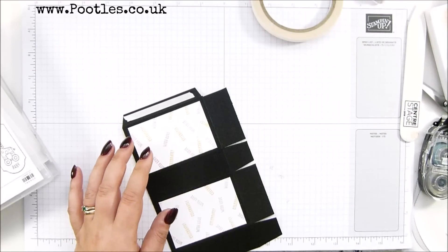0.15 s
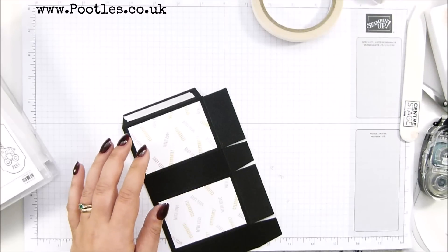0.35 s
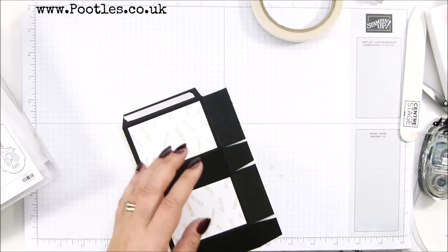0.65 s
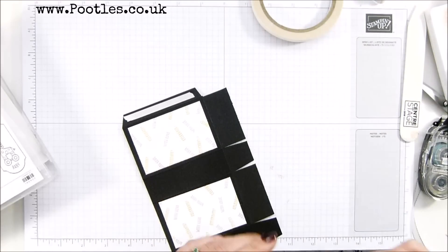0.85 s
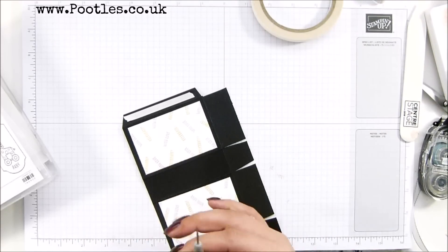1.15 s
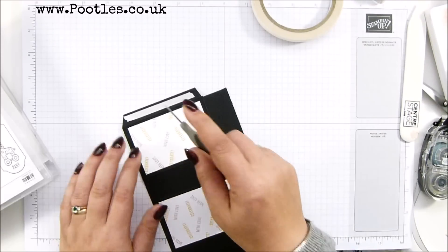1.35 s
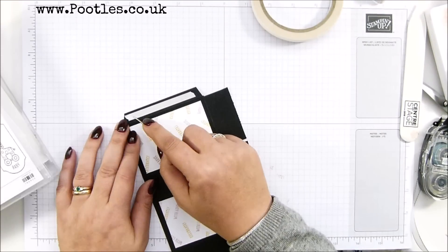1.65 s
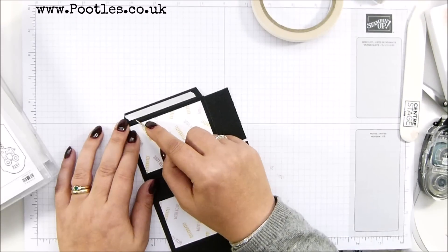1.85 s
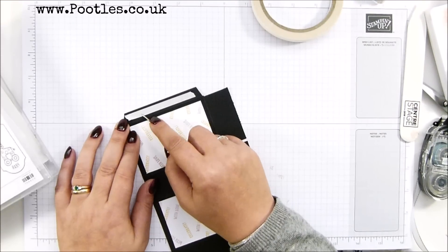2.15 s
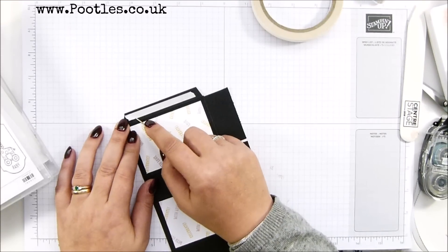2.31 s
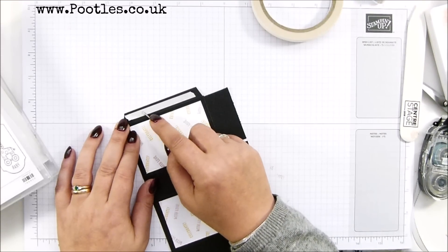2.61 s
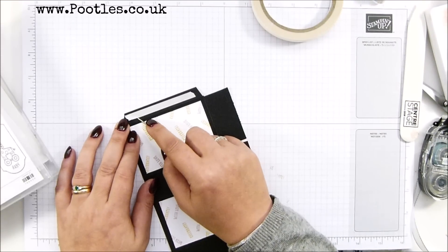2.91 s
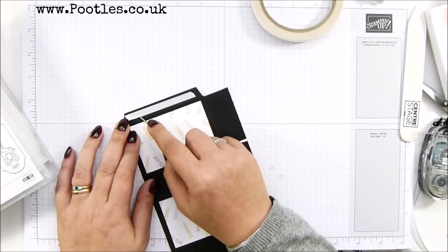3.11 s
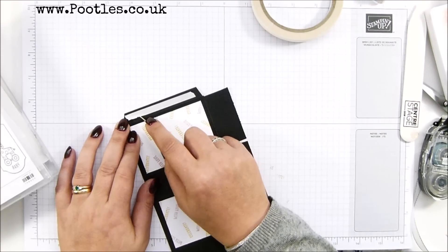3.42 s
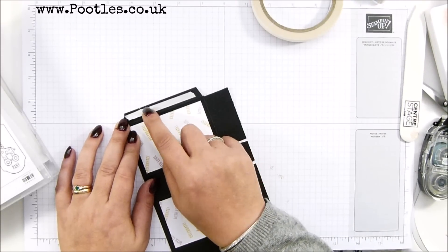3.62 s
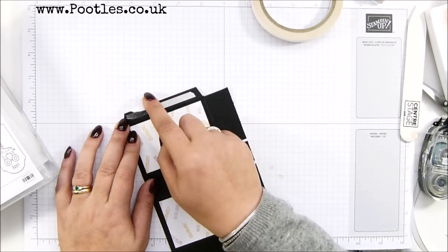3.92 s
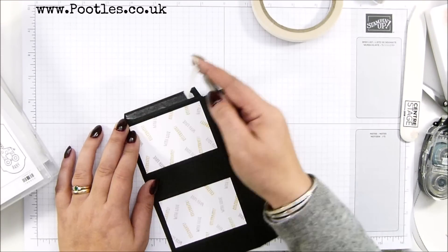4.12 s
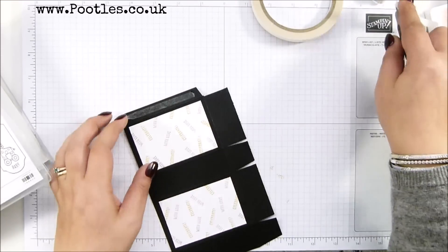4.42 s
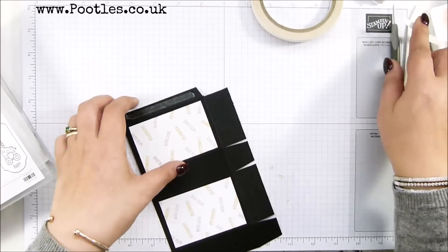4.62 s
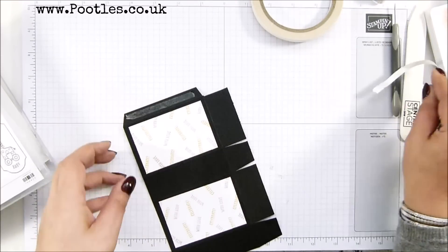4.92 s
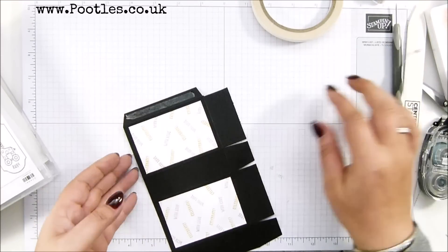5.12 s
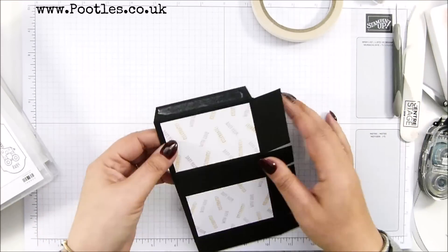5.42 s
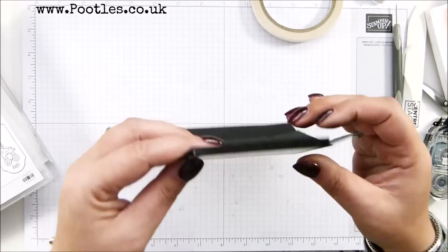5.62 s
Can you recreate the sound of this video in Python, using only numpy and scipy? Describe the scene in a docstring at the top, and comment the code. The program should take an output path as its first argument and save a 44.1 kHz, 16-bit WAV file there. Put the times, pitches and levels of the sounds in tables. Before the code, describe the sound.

A close stereo pickup at a craft table in a small room, with soft steady hiss and barely audible hum and whine. From 0 to 0.9 s a hand rummages in a hollow tool holder slightly to the right: uneven knocks, clinks and rough sliding, strongest at 0.37 to 0.7 s with a heavy clack near 0.55 s. By 1.1 s it is nearly silent. From 1.5 to 3 s a pointed tip makes sparse, tiny ticks on card, about every 0.3 s, with faint palm thuds and skin rubs. Around 3.45 to 3.65 s come very high, thin falling squeaks, then dry sticky crackling of the backing peeling, in small surges until a sharp snap at 4.15 s. The tool lands with a dull wooden knock at 4.66 s. A quiet gap follows; from 5.15 to 5.5 s card slides with a papery, slightly hollow rasp and light flicks, ending in faint rustles.

```python
"""A hand rummages in a tool holder, whose modes ring under knocks and stick-slip, and takes out a pointed tool.
Its tip picks at the liner of double-sided tape on a card: small blows on the table modes.
The liner peels off in crackling glue with thin gliding squeaks and snaps free; the tool is put down.
The card is slid over the table as resonant friction, its air gap sings, and it is lifted.
Palms press and rub as noise; a small room adds tails, hiss, a faint hum and a whine."""
import sys
import numpy as np
from scipy import signal
from scipy.fft import rfft, irfft, next_fast_len
from scipy.io import wavfile

SR = 44100
rng = np.random.default_rng(int(sys.argv[2]) if len(sys.argv) > 2 else 0)


def wav_out(sig):
    """Save sig, one row per channel (or a flat mono array), as 16-bit PCM at SR to the path in sys.argv[1]."""
    wavfile.write(sys.argv[1], SR, np.round(np.clip(np.atleast_2d(sig).T, -1, 1) * 32767).astype(np.int16))


N = 253575
TIME = np.arange(N) / SR   # seconds


def from_db(db):
    """Level law: decibels become an amplitude ratio."""
    return 10 ** (np.asarray(db) / 20)


def rms(x):
    """Effective value: the root of the mean square."""
    return np.sqrt(np.mean(x ** 2) + 1e-20)


def at_hz(points, hz):
    """Logarithmic frequency scale: read a table in equal steps of pitch."""
    f, value = np.transpose(points)
    return np.interp(np.log(np.maximum(hz, 1)), np.log(f), value)


def band(x, low, high):
    """Band filtering: a causal band-pass keeps one range of frequencies."""
    return signal.sosfilt(signal.butter(3, [low, high], "band", fs=SR, output="sos"), x)


def coloured(pair, colour, likeness):
    """Partial coherence: shared and opposed signals set the left-right correlation and spectrum; rms 1."""
    size = pair.shape[1]
    padded = next_fast_len(size)
    hz = np.fft.rfftfreq(padded, 1 / SR)
    mid, side = rfft(pair, padded) * from_db(at_hz(colour, hz))
    alike = np.clip(at_hz(likeness, hz), -1, 1)
    shared = np.sqrt(1 + alike) * mid
    opposed = np.sqrt(1 - alike) * side * [[1], [-1]]
    out = irfft(shared + opposed, padded)[:, :size]
    return out / rms(out)


def noise(colour, likeness, size=N):
    """Random excitation: steady Gaussian stereo noise of a given colour."""
    return coloured(rng.standard_normal((2, size)), colour, likeness)


def dying(t, t60):
    """Exponential decay: 60 dB lost in t60 seconds."""
    return np.exp(-np.log(1000) * t / t60)


# Left-right correlation of nearby sources. Each row: frequency in Hz, correlation from -1 to 1.
NEAR_LIKENESS = [(100, 1), (400, 0.99), (750, 0.93), (1600, 0.77), (4000, 0.39), (9000, 0.26)]


def ringing(modes, t, spread_db):
    """Modal superposition: damped sines of random strength, high ones out of step at the two capsules."""
    hz, db, t60 = np.transpose(modes)[:, :, None]
    strength = from_db(db + spread_db * rng.standard_normal(hz.shape)) * rng.choice([-1, 1], hz.shape)
    skew = np.arccos(np.clip(at_hz(NEAR_LIKENESS, hz), -1, 1)) / 2 * rng.choice([-1, 1], hz.shape)
    fade = strength * dying(t, t60)
    return np.array([(fade * np.sin(2 * np.pi * hz * t + side * skew)).sum(0) for side in (1, -1)])


def panned(pan_db, hz):
    """Diffraction: long waves reach both capsules alike; the full difference holds from 2 kHz up."""
    return from_db(np.array([[.5], [-.5]]) * pan_db * min(1, hz / 2000))   # positive is left


# Edges in Hz of the four zones of a sound: thud, body, ring and crack.
ZONE_EDGES_HZ = [60, 200, 900, 2800, 16000]
# added to every room tail; time constant of its build-up; low-pass corner of its dulling
ROOM_DB, ROOM_BUILD_S, WALL_CUT_HZ = 2, 0.0016, 17000


def blows(rows, modes, colour, thud_db, pan_db, clear_db, spot_db, spot_cycles,
          crack_t60, echo_s, echo_db, tail_db, tail_t60, rise_s):
    """Impact excitation: a blow rings spot and clear modes, and dense ones with an echo and a room tail."""
    t = np.arange(int(.4 * SR)) / SR
    attacks = [t < .04, t < .012, t < .012, t < .012]   # where the level of each zone is set
    out = np.zeros((2, N + len(t)))
    reflection = from_db(echo_db) * (t > echo_s) * dying(np.abs(t - echo_s), crack_t60)
    crack = np.hypot(dying(t, crack_t60), reflection)
    build_up = 1 - np.exp(-t / ROOM_BUILD_S)
    tail = from_db(tail_db + ROOM_DB) * dying(t, tail_t60) * build_up
    walls = signal.butter(1, WALL_CUT_HZ, fs=SR)   # the room returns a duller sound
    for s, body_db, ring_db, crack_db, spot_hz in rows:
        direct = noise(colour, NEAR_LIKENESS, len(t)) * crack
        returned = signal.lfilter(*walls, noise(colour, NEAR_LIKENESS, len(t))) * tail
        dense = direct + returned
        clear = ringing(modes, t, spread_db=4.0)
        # the spot itself dies by 60 dB within a set number of cycles
        spot = ringing([(spot_hz, 0, spot_cycles / spot_hz)], t, spread_db=0)
        layers = [(dense, 0), (clear, clear_db), (spot, spot_db)]
        hit = sum(from_db(db) * x / rms(x[:, attacks[1]]) for x, db in layers)
        hit = hit * (1 - np.exp(-t / rise_s))   # the contact takes a moment to build
        start = max(0, round(s * SR))
        # weight and hardness of the contact set the shares; the low thud follows the body
        levels_db = body_db + thud_db, body_db, ring_db, crack_db
        for low, high, db, attack in zip(ZONE_EDGES_HZ, ZONE_EDGES_HZ[1:], levels_db, attacks):
            part = band(hit, low, high)
            gain = from_db(db) * panned(pan_db, high)
            out[:, start:start + len(t)] += gain * part / rms(part[:, attack])
    return out[:, :N]


STROKE_SHAPE = 1.28   # 1 = pointed, 2 = bell-shaped


def strokes(rows):
    """Power addition: strokes swell and fade, rise and fall reaching 20 dB below the peak; one curve per dB."""
    peak_s, rise_s, fall_s, *columns = np.transpose(rows)[:, :, None]
    away = np.maximum((peak_s - TIME) / rise_s, (TIME - peak_s) / fall_s)
    swell = 10 ** -np.minimum(np.abs(away) ** STROKE_SHAPE, 10)
    return [np.linalg.norm(from_db(db) * swell, axis=0) for db in columns]


def slips(per_s, spread_db, smooth):
    """Stick-slip: tiny clicks of uneven size at random moments, on a bed of smooth rubbing."""
    sizes = (rng.random(N) < per_s / SR) * from_db(spread_db * np.minimum(rng.exponential(1, N), 4))
    # each click dies with a time constant of 0.44 ms
    grains = signal.lfilter([1], [1, -np.exp(-1 / (0.00044 * SR))], sizes + 1e-18)
    return (grains / rms(grains) + smooth) * rng.standard_normal((2, N))


def resonance(x, hz, q):
    """Resonance: a two-pole filter with gain 1 at its peak."""
    return signal.lfilter(*signal.iirpeak(hz, q, fs=SR), x + 1e-18)


def crackle(per_s, spread_db, q, smooth):
    """Random resonant impulses: tiny snaps, each dealt one of 28 pitches, over a smooth hiss."""
    pitches = np.geomspace(900, 15000, 28)   # Hz
    sizes = (rng.random(N) < per_s / SR) * from_db(spread_db * np.minimum(rng.exponential(1, N), 3))
    clicks = sizes * rng.choice([-1, 1], (2, N))
    dealt = rng.integers(0, len(pitches), N)
    snaps = sum(resonance(clicks * (dealt == k), hz, q) for k, hz in enumerate(pitches))
    return snaps / rms(snaps) + smooth * rng.standard_normal((2, N))


def friction(rows, grains, colour, modes, ring_db, pan_db):
    """Friction-driven resonance: grains hiss at the contact and shake the modes of the rubbed thing."""
    drag_gain, hiss_gain = strokes(rows)
    rub = coloured(grains, colour, NEAR_LIKENESS)
    response = ringing(modes, TIME[TIME < .2], spread_db=1)
    rung = signal.fftconvolve(grains[:1], response, axes=1)[:, :N]
    rub = rub + from_db(ring_db) * rung / rms(rung)
    drag = band(rub, ZONE_EDGES_HZ[0], ZONE_EDGES_HZ[3])
    hiss = band(rub, *ZONE_EDGES_HZ[3:])
    return (drag_gain * drag / rms(drag) + hiss_gain * hiss / rms(hiss)) * panned(pan_db, ZONE_EDGES_HZ[3])


def whistle(hz, width_hz):
    """Amplitude modulation: slow noise on a gliding tone makes a narrow band around it; rms 1."""
    waver = signal.sosfilt(signal.butter(2, width_hz, fs=SR, output="sos"), rng.standard_normal((2, N)))
    tone = np.sin(2 * np.pi * np.cumsum(hz) / SR)
    return coloured(waver * tone, [(1, 0)], NEAR_LIKENESS)


# Spectrum of the room hiss. Each row: frequency in Hz, relative level in dB per Hz.
AIR_COLOUR = [(15, -51), (25, -18.5), (108, -6.5), (149, -10), (263, -12.5), (416, -10), (476, -14),
              (1130, -12), (1610, -16), (1890, -16.5), (2110, -18), (2350, -17.5), (3160, -19),
              (10700, -24), (16000, -32)]
# Left-right correlation of the room hiss. Each row: frequency in Hz, correlation from -1 to 1.
AIR_LIKENESS = [(100, 0.93), (300, 0.666), (750, 0.025), (1600, -0.55), (4000, -0.14), (9000, -0.077)]
# A faint whine swelling once. Each row: peak in seconds, rise in seconds, fall in seconds, rms level in dB.
WHINE = [(3.6, 3.0, 0.46, -76)]
AIR_DB, MAINS_DB = -60.5, -77   # rms levels
MAINS_HZ, WHINE_HZ = 100, 1170


def room_tone():
    """Superposition of stationary noise and pure tones: hiss, mains hum and a faint swelling whine."""
    whine_gain, = strokes(WHINE)
    hum = from_db(MAINS_DB) * np.sin(2 * np.pi * MAINS_HZ * TIME)
    whine = whine_gain * np.sin(2 * np.pi * WHINE_HZ * TIME)
    hiss = from_db(AIR_DB) * noise(AIR_COLOUR, AIR_LIKENESS)
    return hiss + np.sqrt(2) * (hum + whine)   # root 2 turns rms into peak


# Tools knocking about in their holder. Each row: start in seconds, then levels before the layer gain:
# body 200-900 Hz in dB, ring 900-2800 Hz in dB, crack above 2800 Hz in dB; pitch of the struck spot in Hz.
HOLDER_KNOCKS = [(0.001, -32.5, -60, -36.5, 322), (0.079, -42, -42, -50.5, 730),
                 (0.15, -43, -29, -38.5, 2430), (0.2, -49, -30, -34.5, 2470), (0.221, -39.5, -41, -65, 300),
                 (0.368, -28, -22.5, -35, 1066), (0.413, -30, -25.5, -35, 740),
                 (0.425, -45.5, -33.5, -34.5, 3860), (0.441, -33, -39.5, -52, 797.5),
                 (0.545, -14, -18.5, -25.5, 703), (0.608, -33, -40, -38, 1500),
                 (0.634, -48, -23, -27.5, 5370), (0.697, -31, -34.5, -41.5, 1500),
                 (0.845, -48, -49, -68, 2250), (0.871, -45, -50.5, -61.5, 2240),
                 (1.009, -58.5, -57, -77, 1430), (1.038, -51, -58, -77, 400)]
# Tools sliding against each other. Each row: peak in seconds, rise in seconds, fall in seconds,
# drag below 2800 Hz in dB and hiss above 2800 Hz in dB, both before the layer gain.
RUMMAGE = [(0.02, .03, 0.089, -39.5, -53), (0.245, 0.22, 0.12, -38.5, -48.5),
           (0.445, 0.065, 0.16, -32.5, -44), (0.57, 0.064, 0.14, -25.5, -39.5),
           (0.645, .06, 0.053, -26, -26.5), (0.665, .13, 0.14, -27.5, -42), (0.782, 0.077, .04, -39, -56),
           (0.89, .05, 0.046, -48, -72)]
# Bright hisses among the tools: soft brushing, and the short bright clink of the knock at 0.2 s.
# Each row: peak in seconds, rise in seconds, fall in seconds, level in dB.
BRIGHT_HISSES = [(.13, 0.051, 0.027, -53.5), (.201, 0.003, 0.023, -40.5), (.275, 0.048, 0.098, -48),
                 (.32, 0.037, 0.036, -53)]
# Spectrum of those hisses. Each row: frequency in Hz, relative level in dB per Hz.
BRIGHT_HISS_COLOUR = [(2000, -30), (6000, -9), (8300, -7), (12000, -7), (16000, -16)]
# Modes of the holder. Each row: frequency in Hz, relative level in dB, 60 dB decay time in seconds.
HOLDER_MODES = [(84.6, -4, 0.27), (145.2, -11, 0.43), (172, -14.5, .2), (300, -10, 0.41), (373, -7, 0.075),
                (443, -24, .16), (530, -18.5, 0.17), (696.7, 4, 0.055), (737, 8, 0.0667),
                (850, -10.5, 0.19), (954, -3, .12), (1065, -8.5, 0.35), (1203, -10, 0.28), (1465, -8, 0.13),
                (1468.5, -0.5, 0.12), (1529, -8, 0.19), (1794, -9, 0.15), (1869, -7, 0.086),
                (2090, 1, 0.089), (2430, -9, 0.12), (3260, -11, 0.28), (3595, -5, 0.063),
                (4165, -9.5, 0.11), (5180, -23.5, 0.06)]
# Dense, unresolved modes of the holder. Each row: frequency in Hz, relative level in dB per Hz.
HOLDER_COLOUR = [(60, -27), (200, -5), (400, 5.5), (800, -3.5), (2300, -3), (3200, -10.5), (5300, -11.5),
                 (7000, -19), (12000, -22.5), (16000, -40.5)]


def tool_holder():
    """Modes under impact and stick-slip: tools in a hollow holder off to the right, with bright hisses."""
    knocks = blows(HOLDER_KNOCKS, HOLDER_MODES, HOLDER_COLOUR, thud_db=-17, pan_db=-2.5,
                   clear_db=-2, spot_db=-2.5, spot_cycles=26, crack_t60=0.032, echo_s=0.0099,
                   echo_db=-5.5, tail_db=-13, tail_t60=0.35, rise_s=0.00041)
    rubbing = slips(per_s=560, spread_db=3.5, smooth=.7)
    ticking = crackle(per_s=1000, spread_db=-0.5, q=41.8, smooth=.1)
    grains = rubbing + from_db(-2) * ticking
    scrape = friction(RUMMAGE, grains, HOLDER_COLOUR, HOLDER_MODES, ring_db=-4, pan_db=-1.0)
    hiss_gain, = strokes(BRIGHT_HISSES)
    hisses = hiss_gain * noise(BRIGHT_HISS_COLOUR, NEAR_LIKENESS)
    return from_db(-1.0) * knocks + from_db(-3.5) * scrape + hisses


# A hand presses on the table. Each row: peak in seconds, level in dB before the layer gain.
PRESSES = [(1.05, -60.5), (1.5, -57.5), (1.64, -63), (3.66, -58.5), (3.74, -60), (3.83, -53.5),
           (4.1, -63.5), (4.95, -65.5), (5.224, -54), (5.31, -66), (5.475, -59)]
# Skin rubs over the paper. Each row: peak in seconds, rise and fall alike in seconds, level in dB.
RUBS = [(1.495, 0.074, -58), (1.64, .16, -64), (1.98, .15, -67.5), (2.29, 0.075, -57), (2.72, .09, -63.5),
        (3.71, .13, -60.5), (4.479, 0.05, -54.5), (4.97, .11, -59), (5.231, 0.094, -50.5),
        (5.7, 0.14, -64.5)]
# Spectrum of the table-top rumble. Each row: frequency in Hz, relative level in dB per Hz.
RUMBLE_COLOUR = [(25, -22), (50, -1.5), (80, 4), (120, -27), (165, 0), (260, -36), (1000, -65)]
# Spectrum of skin on paper. Each row: frequency in Hz, relative level in dB per Hz.
SKIN_COLOUR = [(60, -9), (250, -1), (700, -4.5), (1200, -8), (2000, -4.5), (3200, -10), (9000, -13),
               (16000, -18)]
PRESS_RISE_S, PRESS_FALL_S = 0.059, 0.098


def hands():
    """Low-frequency forcing and surface friction: palms shake the table top and brush over the paper."""
    rumble_gain, = strokes([(s, PRESS_RISE_S, PRESS_FALL_S, db) for s, db in PRESSES])
    rub_gain, = strokes([(s, swell_s, swell_s, db) for s, swell_s, db in RUBS])
    rub = coloured(crackle(per_s=1500, spread_db=6.0, q=6.2, smooth=2.0), SKIN_COLOUR, NEAR_LIKENESS)
    rumble = noise(RUMBLE_COLOUR, NEAR_LIKENESS)
    return from_db(-0.5) * rumble_gain * rumble + rub_gain * rub


# Tool tip and fingernails on the card. Each row: start in seconds, then levels before the layer gain:
# body 200-900 Hz in dB, ring 900-2800 Hz in dB, crack above 2800 Hz in dB; pitch of the struck spot in Hz.
TIP_PICKS = [(1.485, -73, -62, -56, 6160), (1.843, -58.5, -62, -68, 1800), (2.16, -51, -49, -58, 1630),
             (2.418, -62, -59, -63.5, 2040), (2.588, -48.5, -51, -54, 613),
             (2.826, -62, -60.5, -71.5, 1700), (2.975, -58.5, -50, -53.5, 3470),
             (3.709, -56.5, -72, -75, 393), (3.81, -55, -53.5, -56, 1640), (4.289, -59, -58, -55.5, 2540)]
# The tool landing and settling on the table. Each row: start in seconds, body, ring and crack in dB
# before the layer gain, pitch of the struck spot in Hz.
TOOL_DOWN = [(4.574, -45, -52.5, -59.5, 290), (4.619, -48, -56, -57, 300), (4.66, -27.5, -36, -36.5, 307),
             (4.668, -34, -45, -67, 530), (4.722, -39.5, -52, -54.5, 420), (4.882, -78, -63, -54, 5800),
             (4.933, -50, -72.5, -76, 634)]
# Modes of the table. Each row: frequency in Hz, relative level in dB, 60 dB decay time in seconds.
TABLE_MODES = [(73, 9, 0.16), (155.6, -8.5, 0.42), (244.7, -5, 0.17), (266, -7, 0.073), (413, 0, 0.17),
               (534, -13, 0.22), (700.4, 4, 0.034), (760, -27, 0.064), (905, 1, 0.0078), (1037, -19.5, 0.2),
               (1160, -43, 0.011), (1630, 1, 0.1)]
# Dense modes of the table under the tip. Each row: frequency in Hz, relative level in dB per Hz.
TABLE_COLOUR = [(60, -33), (300, -1), (800, -7.5), (1500, -16.5), (2500, -15.5), (4500, -3.5), (7000, -7.5),
                (11000, -13.5), (16000, -19)]
# Dense modes of the table under the landing tool. Each row: frequency in Hz, relative level in dB per Hz.
LANDING_COLOUR = [(60, -12), (300, 2), (800, -3.5), (1300, -7), (2000, -17.5), (4500, -18), (6000, -24),
                  (9000, -17.5), (12500, -18), (16000, -26)]


def pointed_tool():
    """Impact on a plate: the tip picks at the card lying on the table; later the tool is dropped there."""
    picks = blows(TIP_PICKS, TABLE_MODES, TABLE_COLOUR, thud_db=-16, pan_db=-0.4,
                  clear_db=-12.5, spot_db=-10, spot_cycles=13, crack_t60=0.031, echo_s=0.0059,
                  echo_db=-5, tail_db=-14, tail_t60=0.28, rise_s=0.00022)
    landing = blows(TOOL_DOWN, TABLE_MODES, LANDING_COLOUR, thud_db=-17.5, pan_db=-1.5,
                    clear_db=-5, spot_db=-2, spot_cycles=7.9, crack_t60=0.025, echo_s=0.005,
                    echo_db=-7, tail_db=-14.0, tail_t60=0.25, rise_s=0.00021)
    return from_db(1.05) * picks + from_db(-1.5) * landing


# Squeaks of the glue as the liner starts to lift. Each row: peak in seconds, starting pitch in Hz,
# fall in seconds, level in dB.
GLUE_SQUEAKS = [(3.451, 14800, .022, -55), (3.507, 11800, .1, -56.5), (3.594, 12300, .03, -55),
                (3.624, 11800, .02, -45.5)]
SQUEAK_RISE_S, SQUEAK_SAG_OCTAVES_PER_S = 0.0091, 5.5


def glue_squeaks():
    """Length sets pitch: each squeak sinks while it fades, as the freed strip gets longer."""
    s, start_hz, fall_s, db = np.transpose(GLUE_SQUEAKS)
    latest = np.maximum(np.searchsorted(s - SQUEAK_RISE_S, TIME) - 1, 0)
    sagging_s = np.clip(TIME - s[latest], 0, fall_s[latest])
    hz = start_hz[latest] * 2 ** (-SQUEAK_SAG_OCTAVES_PER_S * sagging_s)
    gain, = strokes([(s, SQUEAK_RISE_S, fall_s, db) for s, _, fall_s, db in GLUE_SQUEAKS])
    return gain * whistle(hz, width_hz=900)


# The liner pulled from the tape. Each row: peak in seconds, rise in seconds, fall in seconds,
# drag below 2800 Hz in dB and hiss above 2800 Hz in dB, both before the layer gain.
PEEL = [(3.555, 0.046, 0.15, -76, -59.5), (3.655, 0.073, 0.16, -64, -61), (3.868, 0.052, 0.05, -58, -52),
        (3.98, .07, 0.11, -63, -56), (4.05, .05, .07, -65, -57.5), (4.14, 0.11, .09, -58, -52),
        (4.21, 0.022, 0.041, -53, -56), (4.315, 0.11, 0.12, -61, -58)]
# The liner letting go of the glue. Each row: start in seconds, body, ring and crack in dB
# before the layer gain, pitch of the struck spot in Hz.
LINER_SNAPS = [(3.451, -64.5, -72, -59, 14500), (3.503, -75.5, -68, -64, 11870),
               (3.612, -73, -74, -51, 11440), (3.623, -73, -68, -53, 12700), (3.838, -71, -53, -48.5, 7060),
               (3.853, -76, -51, -46, 9150), (3.894, -56, -56, -47.5, 3630), (4.13, -70, -65, -52, 7000),
               (4.154, -55.5, -42, -35, 7070)]
# Dense modes of the liner. Each row: frequency in Hz, relative level in dB per Hz.
LINER_COLOUR = [(60, -15), (700, -9.5), (1900, -13.5), (3000, -7), (5000, 1.5), (7200, 2.5), (9500, 2),
                (12500, 0.5), (16000, -4.5)]
# Modes of the card, shared with its slide. Each row: frequency in Hz, relative level in dB,
# 60 dB decay time in seconds.
CARD_MODES = [(250, -18.5, 0.024), (498, -16, 0.17), (1054, -7.5, 0.066), (1404, -11, 0.048),
              (1880, -2, 0.062), (2250, 14.5, 0.0069), (3080, 0, 0.014), (4720, 0, 0.034),
              (7110, -23, 0.028)]


def tape_liner():
    """Adhesive fracture: threads of glue break in a crackle, squeak thinly, and let the strip snap free."""
    threads = crackle(per_s=1800, spread_db=3.0, q=25, smooth=1.0)
    peel = friction(PEEL, threads, LINER_COLOUR, CARD_MODES, ring_db=-21.5, pan_db=0.2)
    snaps = blows(LINER_SNAPS, CARD_MODES, LINER_COLOUR, thud_db=-13.5, pan_db=0.0,
                  clear_db=-14.5, spot_db=-9, spot_cycles=190, crack_t60=0.027, echo_s=0.0062,
                  echo_db=-2.5, tail_db=-13, tail_t60=0.18, rise_s=0.00028)
    return from_db(0.5) * peel + from_db(-1) * snaps + glue_squeaks()


# The card dragged over the table. Each row: peak in seconds, rise in seconds, fall in seconds,
# drag below 2800 Hz in dB and hiss above 2800 Hz in dB, both before the layer gain.
CARD_SLIDE = [(5.195, 0.053, 0.15, -56.5, -45), (5.243, 0.034, 0.092, -50.5, -51),
              (5.355, 0.1, 0.097, -44.5, -45), (5.43, 0.077, .09, -47.5, -50.5),
              (5.475, 0.061, .09, -60, -51.5), (5.745, 0.036, .05, -59.5, -56.5)]
# Pitch of the gap, lower as more of the sheet lifts. Each row: time in seconds, frequency in Hz.
CARD_GAP = [(5.18, 3453), (5.24, 2184), (5.31, 2070), (5.39, 1230), (5.455, 2080)]
GAP_DB = -11   # against the table's drag levels


def card_gap():
    """Air-gap resonance: the air under the sheet sings in step with the drag of the card."""
    drag_gain, _ = strokes(CARD_SLIDE)
    gap_hz = np.interp(TIME, *np.transpose(CARD_GAP))
    return from_db(GAP_DB) * drag_gain * whistle(gap_hz, width_hz=300)


# Card edges catching and flicking. Each row: start in seconds, body, ring and crack in dB,
# pitch of the struck spot in Hz.
CARD_FLICKS = [(5.139, -64, -74, -51.5, 5000), (5.303, -62, -39, -44.5, 2050),
               (5.381, -62, -45.5, -50.5, 1220), (5.436, -43.5, -33, -54, 2045),
               (5.454, -60, -58.5, -40.5, 12000), (5.637, -62.5, -54, -53.5, 3200),
               (5.681, -56.5, -73, -62, 582)]
# Dense modes of the card. Each row: frequency in Hz, relative level in dB per Hz.
CARD_COLOUR = [(60, -14.5), (300, -1.5), (700, -11), (1300, 0), (2100, 0), (3500, 0.5), (6000, -0.5),
               (10000, -2.5), (13500, -4), (16000, -20)]


def cardstock():
    """Sliding friction on a thin plate: the sheet rubs on its paper grain, and its flaps catch and flick."""
    grain = crackle(per_s=3400, spread_db=4.0, q=62.0, smooth=1.0)
    slide = friction(CARD_SLIDE, grain, CARD_COLOUR, CARD_MODES, ring_db=-5, pan_db=-1.0)
    flicks = blows(CARD_FLICKS, CARD_MODES, CARD_COLOUR, thud_db=-17.5, pan_db=0.0,
                   clear_db=-8.5, spot_db=-2.5, spot_cycles=21, crack_t60=0.034, echo_s=0.0027,
                   echo_db=-8, tail_db=-8.5, tail_t60=0.18, rise_s=0.00029)
    return from_db(-1.0) * slide + flicks + card_gap()


def scene():
    """Linear superposition: everything on and around the table adds up."""
    return room_tone() + tool_holder() + hands() + pointed_tool() + tape_liner() + cardstock()


def record(dry):
    """Band limitation: a steep elliptic low-pass cuts the top at 16 kHz."""
    return signal.sosfilt(signal.ellip(10, .3, 80, 16000, fs=SR, output="sos"), dry)


dry = scene()
out = record(dry)
wav_out(out)
```